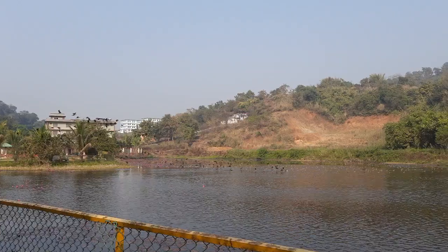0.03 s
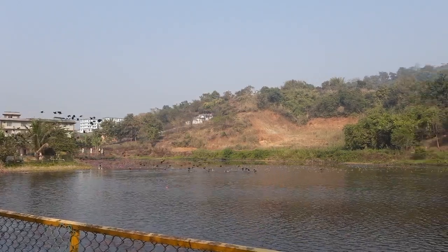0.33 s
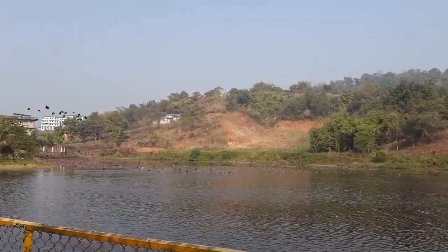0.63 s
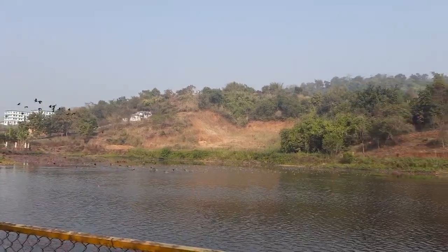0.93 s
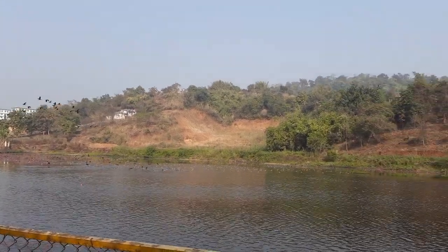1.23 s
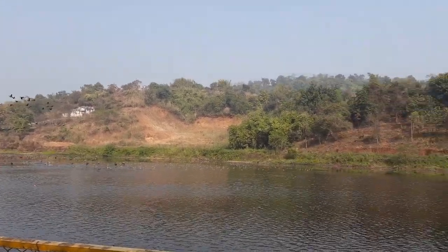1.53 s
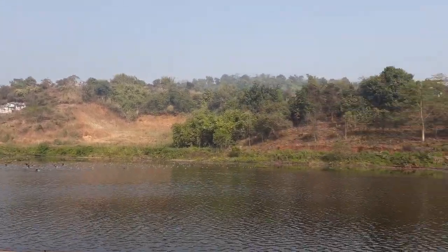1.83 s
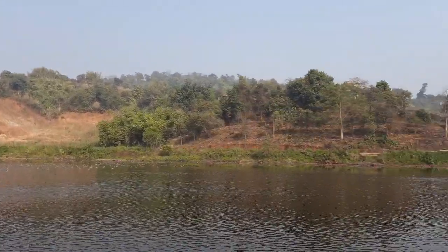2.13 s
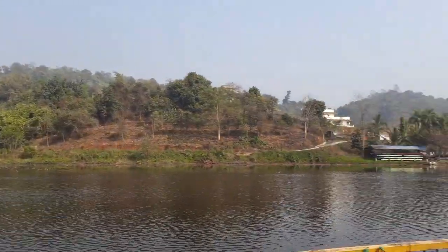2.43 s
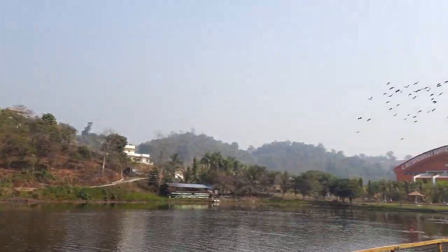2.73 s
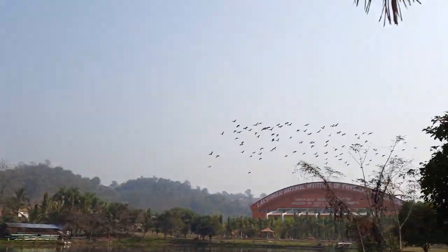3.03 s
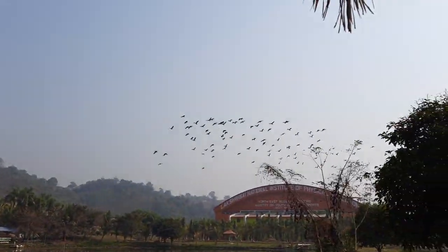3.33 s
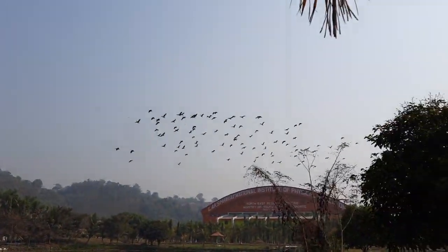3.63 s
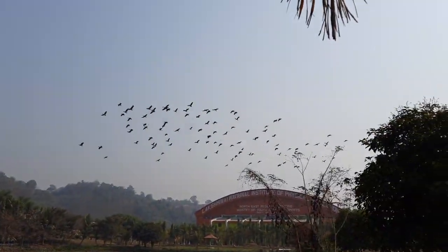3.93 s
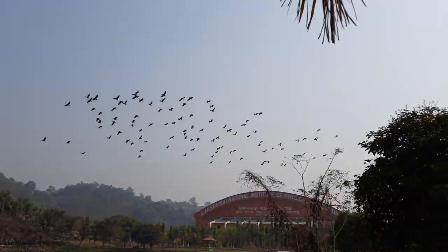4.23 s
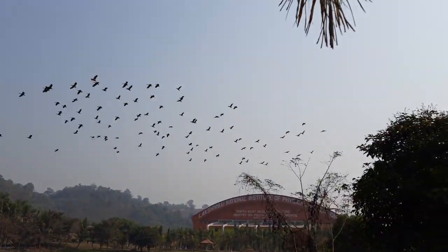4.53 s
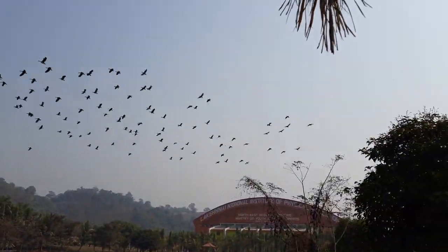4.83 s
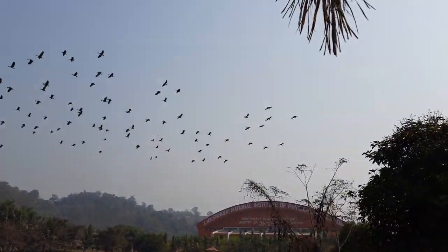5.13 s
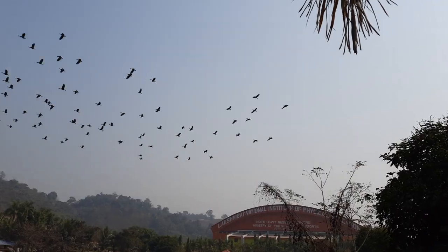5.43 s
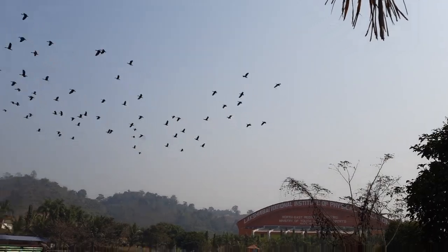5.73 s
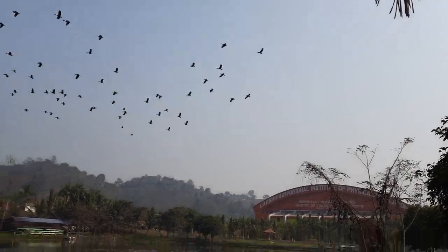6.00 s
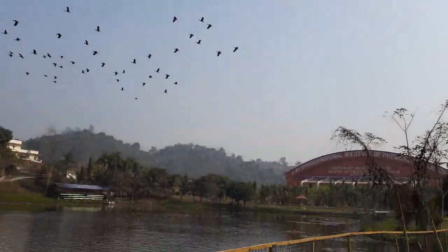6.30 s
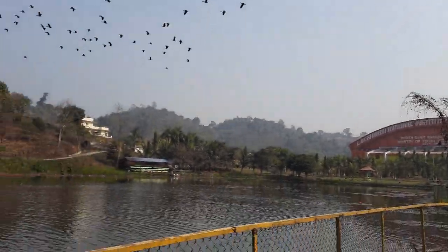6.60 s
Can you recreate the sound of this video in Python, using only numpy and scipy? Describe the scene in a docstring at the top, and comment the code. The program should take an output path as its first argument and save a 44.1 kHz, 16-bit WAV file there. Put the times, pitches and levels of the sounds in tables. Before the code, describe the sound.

Shrill, rising whistles from a flock of flying ducks overlap and swell as they come closer, with faint insects and light wind behind.

```python
"""Many shrill whistles at once: a flock of whistling ducks flies over a lake and comes closer.
Each whistle sweeps up, then holds, breaks upward or droops roughly; the far birds blur into a chorus,
and water and shore reflect the calls. Behind them: a bird across the lake, thin insects,
a motor's hum, a tick and a little wind on the microphone."""
import sys
import numpy as np
from scipy import signal
from scipy.fft import rfft, irfft, next_fast_len
from scipy.io import wavfile
from scipy.ndimage import uniform_filter1d, map_coordinates

SR = 44100
rng = np.random.default_rng(int(sys.argv[2]) if len(sys.argv) > 2 else 0)


def to_wav(s):
    """Save 16-bit WAV."""
    ch = np.atleast_2d(s).T  # columns
    pcm = np.round(np.clip(ch, -1, 1) * 32767)  # PCM
    wavfile.write(sys.argv[1], SR, pcm.astype(np.int16))


N = 302526
TIME = np.arange(N) / SR
# Chorus, swelling as the flock approaches. Each row: time in seconds, level in dB.
FLOCK = [(0.0, -51.5), (0.36, -47.5), (0.65, -53), (1.36, -47.5), (1.99, -52.5), (2.37, -45.5), (2.69, -59),
         (3.05, -45.5), (3.6, -58.5), (4.2, -53), (4.9, -42), (5.6, -43.5), (5.96, -39), (6.15, -43.5),
         (6.59, -41.5), (6.86, -42.5)]


def whistle(length_s, top_hz, db, overtone_db, step=0, droop=0, rise_s=0.039, sweep=0.44,
            hoarse_db=-29, side_db=-16, jitter=0.0111):
    """One call: tension pulls the pitch up; the voice may break upward, then lets go and turns rough."""
    # Duck's throat. Each row: frequency in Hz, gain in dB.
    throat = [(1200, -25), (2100, 12.5), (3100, -14), (4500, -51), (5600, 16), (7200, -4), (9000, -29),
              (15000, -31)]
    # The voice thins above its easy range. Each row: pitch in Hz, gain in dB.
    voice_range = [(5000, 0), (5800, 0), (6500, -2)]
    fade_s, fall_s, break_s = 0.0068, 0.032, 0.00462
    t = np.arange(0, length_s + fade_s, 1 / SR)
    let_go_s = max(rise_s, length_s - fall_s)
    up = np.minimum(t / rise_s, 1)
    down = np.clip((t - let_go_s) / max(length_s - let_go_s, .01), 0, 1)
    broken = np.clip((t - rise_s) / break_s, 0, 1) * (step > .05)
    hz = top_hz * (1 - sweep * (1 - up) ** 1.5) * (1 + step * broken) * (1 - droop * down ** 1.5)
    hz *= 1 + 0.03186 * (1 - up + down) * wander(t, 130.6)  # steadiest on the held note
    strain = amp(9 * np.minimum(broken + 3 * droop * down, 1))
    phase = 2 * np.pi * np.cumsum(hz * (1 + jitter * np.sqrt(strain) * wander(t, 326.6))) / SR
    # a second, slower vibration adds rough side tones
    beat = np.cumsum(np.gradient(phase) * (rng.uniform(.28, .4) + .016 * wander(t, 400)))
    tone = np.sin(phase) + amp(side_db) * strain * (np.sin(phase - beat) + .5 * np.sin(phase + beat))
    # the other side of the voice box joins in, slightly lower
    tone += amp(-21) * strain * np.sin(0.99 * phase + 2 * wander(t, 200))
    rasp = 1 + 0.51 * (np.cos(beat) + wander(t, 900))
    overtone_gain = amp(overtone_db) * rasp / (1 + (hz / 5000) ** 8)
    tone += overtone_gain * (np.sin(2 * phase) + amp(-14) * np.sin(3 * phase))
    # irregular vibration adds a hoarse edge
    hoarse = amp(hoarse_db) * strain * unit(colour(rng.standard_normal(len(t)), throat))
    swell_db = -13 * np.maximum(1 - up / 0.75, 0)
    decay_db = -26 * np.maximum(t - rise_s, 0) - 23.5 * droop * down
    break_db = -6 * broken - 2.5 * np.sin(np.pi * broken)
    flutter_db = 3.5 * wander(t, 160.5)
    gain = amp(db + swell_db + decay_db + break_db + flutter_db + lookup(hz, voice_range))
    gate = np.clip(np.minimum(t, t[-1] - t) / fade_s, 0, 1)
    return (np.sqrt(2) * tone + hoarse) * gate * gain


def near_ducks(gain_db=-3, bright_db=-0.5):
    """The near birds, whose whistles stand out."""
    # Each row: start in seconds, length in seconds, top of the sweep in Hz, upward break and droop as
    # fractions of pitch, relative level in dB, relative overtone level in dB, left over right in dB.
    whistles = [(0.078, 0.052, 4520, 0.2, 0.0, -44, -18, -2), (0.169, 0.07, 4930, 0.03, 0.25, -40, -27, -1),
                (0.267, 0.033, 4830, 0.0, 0.0, -34.5, -24, 8),
                (0.371, 0.029, 4850, 0.0, 0.0, -35.5, -18, 6),
                (0.279, 0.071, 4850, 0.28, 0.09, -36.5, -30, 5), (0.33, 0.088, 4724, 0.05, 0.2, -39, -8, 0),
                (0.329, 0.042, 3300, 0.04, 0.05, -46, -22, 9),
                (0.413, 0.078, 5920, 0.02, 0.02, -44.5, -32, 4),
                (0.482, 0.053, 4310, 0.12, 0.0, -43.5, -26, 5),
                (0.734, 0.081, 4310, 0.3, 0.13, -43.5, -20, 3), (0.82, 0.1, 4620, 0.2, 0.24, -41.0, -21, 2),
                (0.929, 0.044, 4510, 0.06, 0.0, -39, -26, 9), (0.961, 0.089, 5840, 0.09, 0.05, -44, -23, 2),
                (1.118, 0.097, 4740, 0.2, 0.17, -41.5, -17, 3),
                (1.151, 0.083, 4850, 0.11, 0.2, -41, -10, 0), (1.258, 0.07, 4430, 0.4, 0.6, -40, -33, 9),
                (1.307, 0.11, 4750, 0.06, 0.22, -41.5, -30, 5), (1.326, 0.034, 3270, 0.0, 0.0, -42, -24, 5),
                (1.405, 0.066, 5250, 0.07, 0.0, -42, -34, 5),
                (1.644, 0.03, 4730, 0.0, 0.0, -41.5, -9.5, -8),
                (1.712, 0.035, 4320, 0.17, 0.0, -39, -15, -5),
                (1.733, 0.11, 4375, 0.0, 0.06, -40.5, -24, 3), (1.854, 0.079, 4800, 0.07, 0.3, -43, -26, 4),
                (2.059, 0.06, 4740, 0.23, 0.06, -46, -9, -3), (2.323, 0.052, 4670, 0.13, 0.14, -47, -31, 0),
                (2.375, 0.056, 4360, 0.14, 0.22, -38.5, -15, -2),
                (2.483, 0.058, 5350, 0.25, 0.1, -41, -15, -1),
                (2.629, 0.055, 4290, 0.07, 0.34, -41, -16, 3),
                (2.968, 0.12, 4790, 0.07, 0.37, -40.5, -8, -11),
                (3.286, 0.066, 4310, 0.03, 0, -42.5, -9, -2),
                (3.445, 0.088, 4953, 0.08, 0.47, -34.5, -20.5, 2.5),
                (3.651, 0.075, 4750, 0.04, 0.5, -36, -16, 3),
                (3.683, 0.082, 4630, 0.03, 0.31, -41.5, -16, 4),
                (3.938, 0.076, 4350, 0.05, 0.57, -36, -15, 0.5),
                (4.037, 0.089, 4910, 0.05, 0.6, -34, -16, 3), (4.222, 0.046, 4860, 0.17, 0.0, -39, -12, -2),
                (4.406, 0.094, 4070, 0.02, 0.37, -37, -28, 5),
                (4.405, 0.094, 6630, 0.04, 0.18, -38.5, -30, -4),
                (4.508, 0.06, 4420, 0.14, 0.1, -38.5, -14, -1),
                (4.589, 0.033, 4806, 0.2, 0.0, -31.5, -18, 3),
                (4.727, 0.078, 4940, 0.3, 0.28, -32.5, -36, 2),
                (4.778, 0.075, 4670, 0.02, 0.3, -36, -33, -1), (4.819, 0.044, 3740, 0.0, 0.1, -34, -15, 4),
                (4.874, 0.051, 4480, 0.14, 0.04, -34, -17, -1),
                (4.939, 0.1, 5100, 0.05, 0.1, -39.5, -34, 4), (5.086, 0.11, 5110, 0.03, 0.0, -40, -12, -1),
                (5.112, 0.06, 4900, 0.3, 0.0, -34.5, -7, -5), (5.286, 0.11, 6470, 0.02, 0.01, -36, -30, -2),
                (5.424, 0.093, 4680, 0.06, 0.13, -32, -21, 2),
                (5.498, 0.072, 4170, 0.09, 0.36, -34, -21, 6), (5.541, 0.28, 5410, 0.08, 0.0, -44, -31, -3),
                (5.63, 0.055, 3330, 0.01, 0.0, -43, -20, 7), (5.668, 0.087, 5020, 0.07, 0.8, -39, -25, 0),
                (5.746, 0.063, 4630, 0.4, 0.13, -33, -23, 3),
                (5.821, 0.065, 4850, 0.0, 0.06, -33.5, -38, 2),
                (5.877, 0.052, 4220, 0.0, 0.0, -35, -33, 16), (5.901, 0.06, 4730, 0.01, 0.0, -27.5, -32, 4),
                (5.999, 0.068, 4250, 0.06, 0.01, -35, -21, 3),
                (6.082, 0.087, 4690, 0.32, 0.13, -38, -12, -1),
                (6.322, 0.12, 4595, 0.05, 0.55, -35.5, -22, 0.5),
                (6.478, 0.053, 4050, 0.03, 0.01, -36.5, -16, 1),
                (6.487, 0.069, 4530, 0.0, 0.0, -31, -25, 2.5),
                (6.501, 0.098, 4700, 0.09, 0, -36.5, -16, -2),
                (6.562, 0.072, 4300, 0.0, 0.06, -32.5, -22, 1),
                (6.599, 0.11, 5060, 0.04, 0.0, -39, -20, -1), (6.719, 0.05, 4560, 0.0, 0.0, -35.5, -19, 0),
                (6.752, 0.092, 4820, 0.13, 0.3, -33.5, -28, 1)]
    out = np.zeros((2, N))
    for s, length_s, top_hz, step, droop, db, overtone_db, left_db in whistles:
        call = whistle(length_s, top_hz, db, overtone_db + bright_db, step, droop)
        add(out, s, place(call, s, left_db))
    return amp(gain_db) * out


def slide(length_s, start_hz, end_hz, db, jitter=0.011):
    """A thin whistle that drifts between two pitches, swells and dies away."""
    t = np.arange(0, length_s, 1 / SR)
    hz = start_hz + (end_hz - start_hz) * t / length_s
    phase = 2 * np.pi * np.cumsum(hz * (1 + jitter * wander(t, 395))) / SR
    swell = np.sqrt(2 * np.sin(np.pi * t / length_s))
    return np.sin(phase) * amp(db + 2 * wander(t, 86)) * swell


def near_slides(gain_db=-1, left_db=4):
    """Near whistles that hold their note or slide slowly."""
    # Each row: start in seconds, length in seconds, start and end pitch in Hz, relative level in dB.
    slides = [(0.329, 0.089, 4550, 4670, -39.5), (1.174, 0.1, 2605, 2250, -55),
              (1.218, 0.044, 4100, 3820, -43.5), (3.134, 0.045, 3120, 3270, -49),
              (3.196, 0.1, 2950, 2420, -53), (4.09, 0.19, 2726, 2430, -58),
              (4.315, 0.04, 4190, 4190, -44.5), (4.859, 0.14, 2480, 1793, -57),
              (5.112, 0.12, 5340, 5260, -45), (5.149, 0.064, 5620, 5550, -45),
              (5.793, 0.04, 4540, 4350, -36.5), (5.796, 0.093, 2960, 2820, -44.5),
              (5.866, 0.067, 4545, 4330, -34), (5.929, 0.057, 3200, 3380, -42),
              (6.439, 0.058, 4390, 4030, -40.5), (6.555, 0.047, 5400, 5620, -40),
              (6.578, 0.19, 2370, 2160, -56), (6.605, 0.024, 4320, 4420, -25.5),
              (6.665, 0.055, 5120, 5260, -39), (6.674, 0.041, 4500, 3940, -35.5)]
    out = np.zeros((2, N))
    for s, *note in slides:
        add(out, s, place(slide(*note), s, left_db))
    return amp(gain_db) * out


def rasps(squeals=7, gain_db=-4.5):
    """Hoarse calls, each a tangle of short, skidding squeals."""
    # Each row: start in seconds, length in seconds, relative level in dB.
    calls = [(0.33, 0.14, -58), (0.787, 0.11, -52), (1.671, 0.069, -52), (2.377, 0.11, -47.5),
             (2.961, 0.14, -40.5), (3.305, 0.066, -50.5), (3.802, 0.053, -50), (4.091, 0.044, -45),
             (4.366, 0.13, -43), (4.87, 0.22, -42.5), (5.094, 0.21, -46), (5.675, 0.052, -52),
             (6.49, 0.12, -54), (6.772, 0.097, -48)]
    out = np.zeros((2, N))
    for s, length_s, db in calls:
        for k, pitch in enumerate(rng.random(squeals)):
            squeal = whistle(.04, 3300 + 1800 * pitch, db, overtone_db=-9, droop=.4, rise_s=.022,
                             hoarse_db=-23, side_db=-12, jitter=.025)
            add(out, s + (length_s - .03) * k / squeals, anywhere(squeal, s))
    return amp(gain_db) * out


def far_ducks(count=480, centre_hz=4350, spread_octaves=0.3, spread_db=2, wet_db=-9):
    """Hundreds of weaker whistles, ever denser, that blur into a chorus."""
    # Each row: time in seconds, overtone level in dB.
    overtones = [(0, -31), (4.2, -9), (5.2, -13), (6.86, -14)]
    out = np.zeros((2, N))
    for k, (when, rise, hold, sweep, droop, leap) in enumerate(rng.random((count, 6))):
        s = ((k + when) / count) ** .85 * N / SR - .03
        rise_s = .022 + .028 * rise
        length_s = rise_s + .008 + .06 * hold ** 2
        pitch, loudness = np.clip(rng.standard_normal(2), -2, 2)
        top_hz = centre_hz * 2 ** (spread_octaves * pitch)
        db = spread_db * loudness - 2.5 * max(pitch, 0) ** 2  # high calls carry less far
        call = whistle(length_s, top_hz, db, lookup(s, overtones), step=.2 * (leap > .75),
                       droop=.42 * droop, rise_s=rise_s, sweep=.3 + .18 * sweep, hoarse_db=-35)
        add(out, s, anywhere(call, s))
    out += amp(wet_db) * echoes(out, t60_s=0.34, delay_s=0.0038)
    return out / running_rms(out, samples=4000) * level(FLOCK)


def low_calls(count=85, gain_db=-11, spread_db=3, low_hz=2150, high_hz=3300, glide=0.1285):
    """Soft low notes throughout the flock, as birds lead into a whistle or trail off."""
    out = np.zeros((2, N))
    for k, (when, span, pitch, slope, loudness) in enumerate(rng.random((count, 5))):
        s = (k + when) / count * N / SR
        hz = low_hz + (high_hz - low_hz) * pitch
        bend = glide * (2 * slope - 1)
        note = slide(.03 + .06 * span, hz * (1 - bend), hz * (1 + bend), spread_db * (2 * loudness - 1))
        add(out, s, anywhere(note, s))
    return out * level(FLOCK) * amp(gain_db)


def place(call, s, left_db, spread_ms=0.048, bounces=4, bounce_db=-13, bounce_s=.024):
    """Bearing sets the lag between the ears, left_db the balance; water and bank return late copies."""
    # Which ear hears the calls first, shifting as the microphone turns.
    # Each row: time in seconds, lead of the left ear in ms.
    bearing = [(0, 0.052), (2.2, -0.015), (2.3, 0.4), (4.1, 0.41), (4.2, 0.029), (4.6, -0.22),
               (5.1, -0.0026), (5.55, 0.041), (5.7, 0.45), (6.3, 0.45), (6.4, 0.22)]
    out = np.zeros((2, len(call) + SR // 20))
    pan = amp(left_db)
    lead_ms = lookup(s, bearing) + spread_ms * rng.standard_normal()
    for ear, side in ((out[:1], 1), (out[1:], -1)):
        heard = call * np.sqrt(2 * pan ** side / (pan + 1 / pan))
        add(ear, max(-side * lead_ms / 1000, 0), heard)
        for late in rng.random(bounces):
            add(ear, bounce_s * (.08 + late), heard * amp(bounce_db))
    return out


def anywhere(call, s, left_db=5.5, spread_db=9.5):
    """Places a call at random within the flock, which flies a little to the left."""
    return place(call, s, left_db + spread_db * rng.standard_normal())


def echoes(x, t60_s, delay_s):
    """Scattered reflections from bank and trees, different in each ear."""
    t = np.arange(SR) / SR
    taps = rng.standard_normal((2, SR)) * (rng.random((2, SR)) < .05)
    taps *= amp(-60 * t / t60_s) * (t > delay_s)
    return signal.fftconvolve(x, taps / np.linalg.norm(taps[0]), axes=1)[:, :N]


def far_bird(wet_db=-2, dry_db=-3):
    """A rough, drooping cry, mostly echo after crossing the lake."""
    # Each row: start in seconds, length in seconds, pitch in Hz, relative level in dB.
    cries = [(2.969, 0.16, 1597, -58), (3.71, 0.16, 1595, -60)]
    out = np.zeros((2, N))
    for s, length_s, hz, db in cries:
        add(out, s, whistle(length_s, hz, db, overtone_db=-18, droop=0.108, rise_s=0.029, sweep=0.042,
                            side_db=-15, jitter=0.042))
    return amp(dry_db) * out + amp(wet_db) * echoes(out, t60_s=0.7, delay_s=0.0082)


def insects(high_pulse_hz=112, low_pulse_hz=66, low_stop_s=1.63):
    """Two thin, pulsing buzzes in the grass to the right; the lower stops early."""
    high = amp(-69) * noise([(6500, -33), (8000, 3.5), (8750, 4.5), (9600, -21), (11000, -41)], shared=0)
    low = amp(-66) * noise([(6500, -25), (7300, -12.5), (7850, -2), (8600, -43)], shared=0)
    fast, slow = (unit(1.2 + np.cos(2 * np.pi * hz * TIME + wander(TIME, 9)))
                  for hz in (high_pulse_hz, low_pulse_hz))
    ending = np.clip((low_stop_s - TIME) * 10, 0, 1)
    return (high * fast + low * slow * ending) * amp([[-6], [4]])


def open_air():
    """A soft, wavering rush of open air."""
    # Each row: frequency in Hz, relative spectral density in dB.
    spectrum = [(20, -22), (35, 2.5), (55, -5.5), (110, 2.5), (230, 2.5), (420, -6), (680, -5.5),
                (900, -11), (1400, -11.5), (2800, -6), (5000, -14.5), (7000, -12.5), (8700, -32),
                (10200, -22), (16000, -43)]
    return amp(-56 + 2.24 * wander(TIME, 3.27)) * noise(spectrum, shared=0.38)


def far_shore():
    """A faint murmur from the far shore."""
    # Each row: time in seconds, level in dB.
    murmur = [(0, -64), (1.3, -60.5), (1.7, -75), (2.2, -63), (2.6, -92)]
    spectrum = [(200, -56), (620, -5), (850, -18), (1100, -11), (3000, -86)]
    return level(murmur) * noise(spectrum, shared=0.88)


def wind():
    """Low lumps of wind on the microphone."""
    # Each row: time in seconds, level in dB.
    gusts = [(1.8, -67), (1.88, -47.5), (1.97, -49.5), (2.08, -58), (2.36, -44.5), (2.5, -57.5),
             (2.62, -46), (2.9, -49), (3.3, -56.5), (3.5, -79)]
    buffeting = amp(2.5 * wander(TIME, 22))
    spectrum = [(20, -25), (45, 6), (90, 10), (350, -16), (1500, -69.5)]
    return level(gusts) * buffeting * noise(spectrum, shared=0.22)


def motor_hum(hz=65.6, waver=0.011):
    """A distant motor: two low orders that waver a little."""
    # Each row: time in seconds, level in dB.
    swell = [(0, -62), (3, -60.5), (5, -58.5), (6.86, -53.5)]
    phase = 2 * np.pi * np.cumsum(hz * (1 + waver * wander(TIME, 3.344))) / SR
    first = amp(-5 + 2 * wander(TIME, 13)) * np.sin(phase)
    second = amp(1.1 * wander(TIME, 6.1)) * np.sin(2 * phase)
    return np.sqrt(2) * (first + second) * level(swell)


def tick(start_s=3.229, ring_hz=7300, t60_s=.0039, gap_s=0.0085, rebound_db=-10):
    """A tiny hard click near the microphone, and its rebound."""
    t = np.arange(0, .01, 1 / SR)
    click = np.sin(2 * np.pi * ring_hz * t) + .5 * rng.standard_normal(len(t))
    click *= amp(-32 - 60 * t / t60_s)
    out = np.zeros((2, N))
    add(out, start_s, click)
    add(out, start_s + gap_s, amp(rebound_db) * click)
    return colour(out, [(4800, -45), (7000, 4), (9000, -3), (14000, 0)])


def amp(db):
    return 10 ** (np.asarray(db) / 20)


def unit(x):
    return x / np.sqrt(np.mean(x ** 2) + 1e-20)


def running_rms(x, samples):
    return np.sqrt(abs(uniform_filter1d(np.mean(x ** 2, 0), samples)) + 1e-9)


def lookup(x, rows):
    return np.interp(x, *np.transpose(rows))


def level(rows):
    """Gain over time from (s, dB) rows."""
    return amp(lookup(TIME, rows))


def colour(x, points):
    """Filters by a spectrum of (Hz, dB) points."""
    hz, db = np.transpose(points)
    size = next_fast_len(x.shape[-1])
    gain = amp(np.interp(np.log(np.fft.rfftfreq(size, 1 / SR) + 1), np.log(hz), db))
    return irfft(rfft(x, size) * gain, size)[..., :x.shape[-1]]


def noise(points, shared):
    """Stereo noise shaped by (Hz, dB) points; shared is the power fraction common to both ears."""
    white = rng.standard_normal((3, N))
    return unit(colour(np.sqrt(shared) * white[2] + np.sqrt(1 - shared) * white[:2], points))


def wander(t, per_s):
    """Smooth random drift of about unit size."""
    knots = 1.3 * rng.standard_normal(256)
    return map_coordinates(knots, [t * per_s], order=2, mode="wrap", prefilter=False)


def add(mix, s, sound):
    part = mix[:, max(round(s * SR), 0):][:, :sound.shape[-1]]
    part += sound[..., :part.shape[1]]


def scene(echo_db=-10):
    """Near ducks and their shore echo over the chorus and the lakeside background."""
    # A duck's throat sounds little below its lowest note. Each row: frequency in Hz, gain in dB.
    low_cut = [(1400, -24), (1900, 0)]
    near = near_ducks() + rasps() + near_slides()
    near += amp(echo_db) * echoes(near, t60_s=0.25, delay_s=0.016)
    ducks = colour(near + far_ducks() + low_calls(), low_cut)
    wildlife = ducks + far_bird() + insects()
    background = (open_air() + far_shore() + wind() + motor_hum()) * amp([[1], [-1]])
    return wildlife + background + tick()


def record(dry, edge_hz=15900):
    """Microphone colour, then the band limit."""
    # Each row: frequency in Hz, gain in dB.
    microphone = [(9200, 2.5), (10200, -7), (13000, 4.5), (16000, -0.5)]
    lowpass = signal.firwin(511, edge_hz, window=("kaiser", 9), fs=SR)
    return signal.oaconvolve(colour(dry, microphone), lowpass[None], "same")


dry = scene()
out = record(dry)
to_wav(out)
```